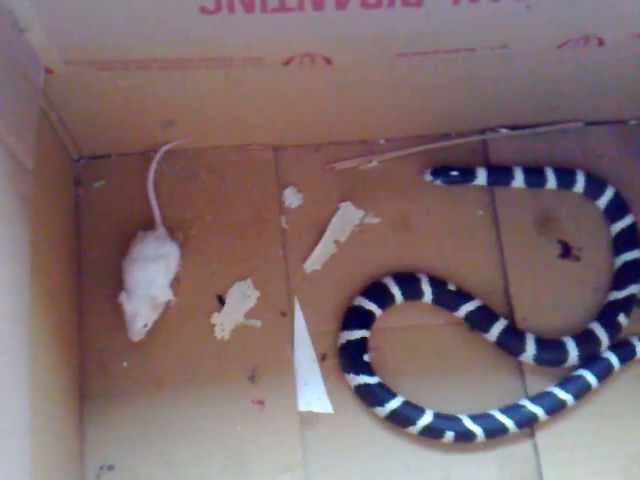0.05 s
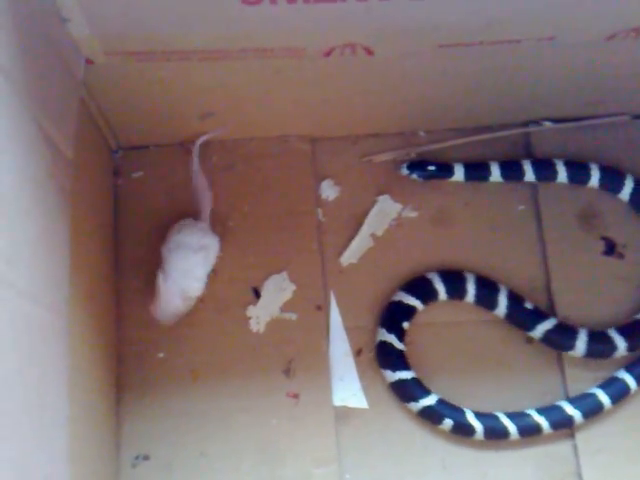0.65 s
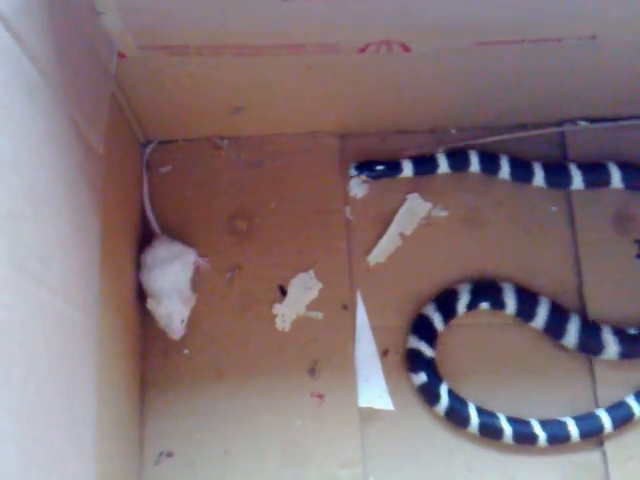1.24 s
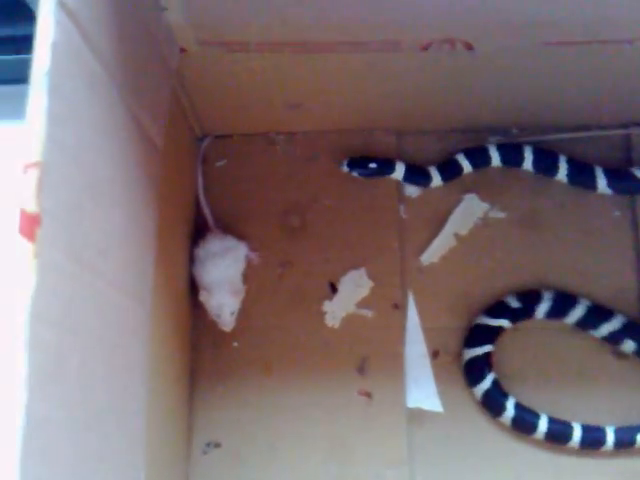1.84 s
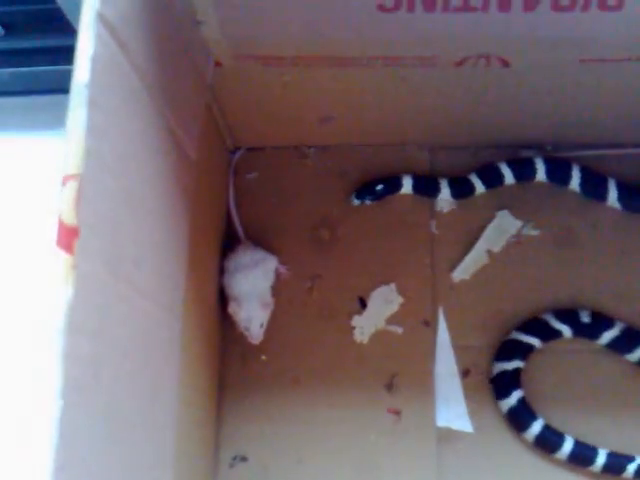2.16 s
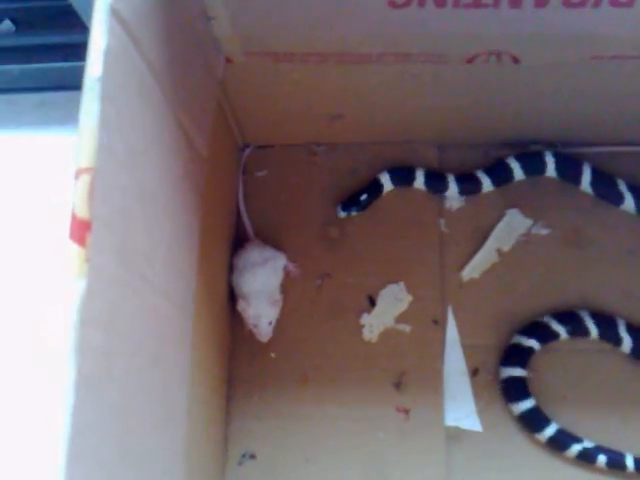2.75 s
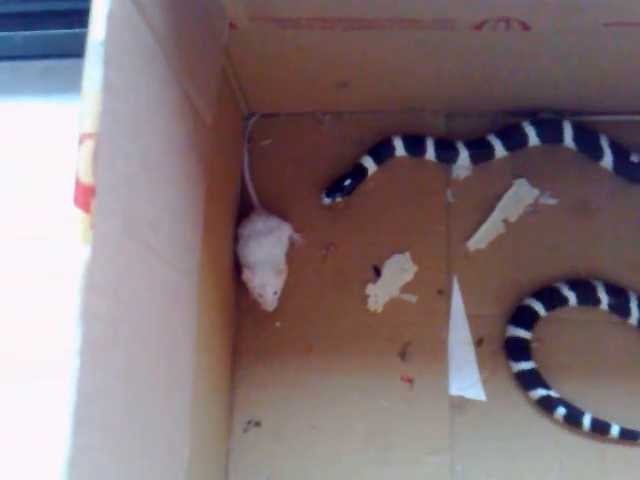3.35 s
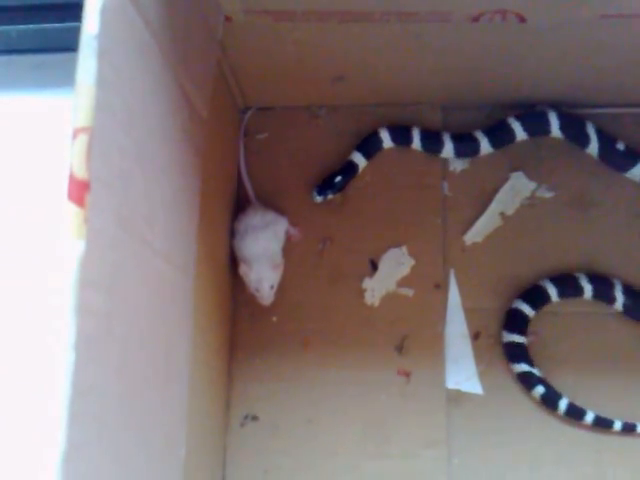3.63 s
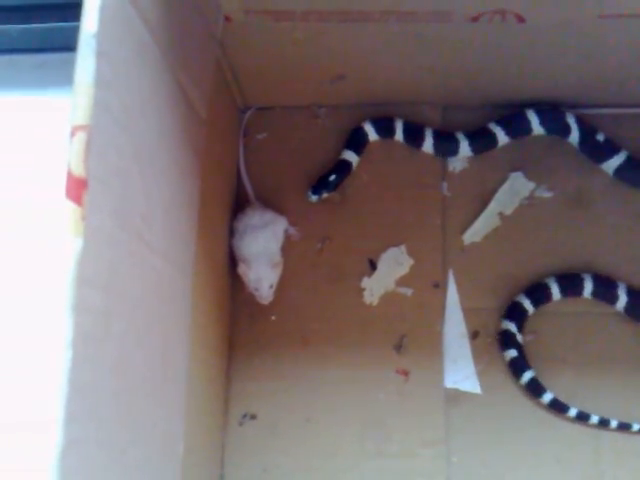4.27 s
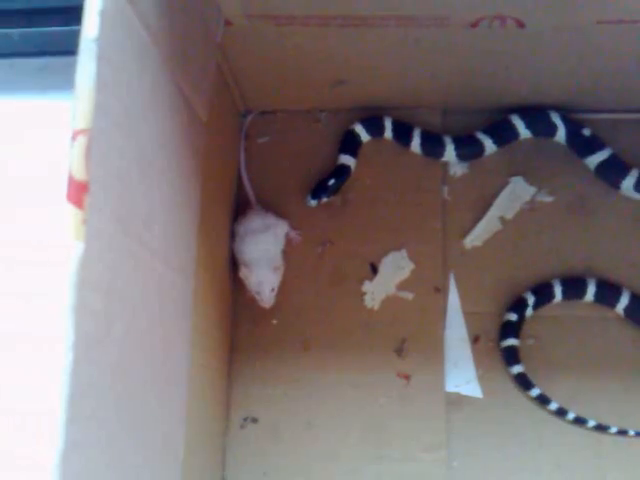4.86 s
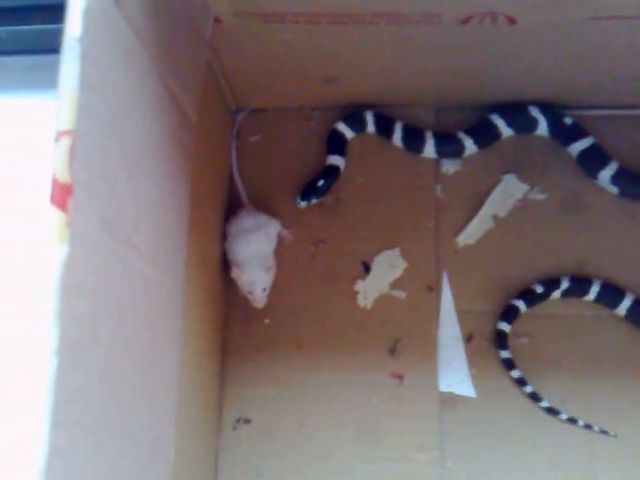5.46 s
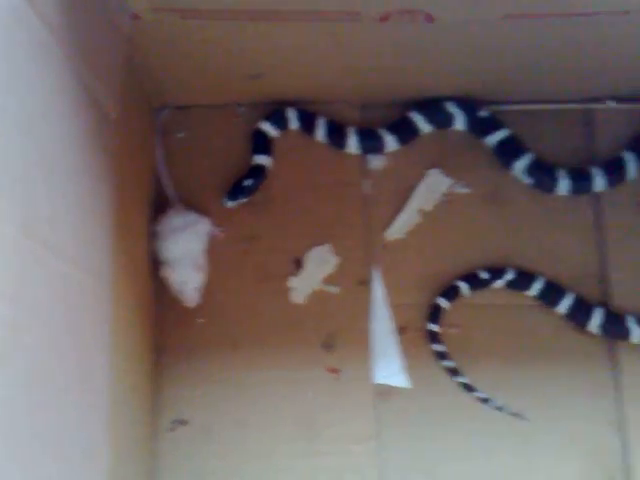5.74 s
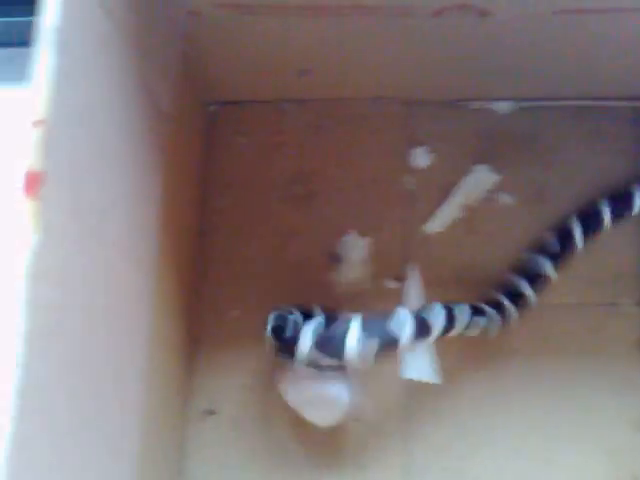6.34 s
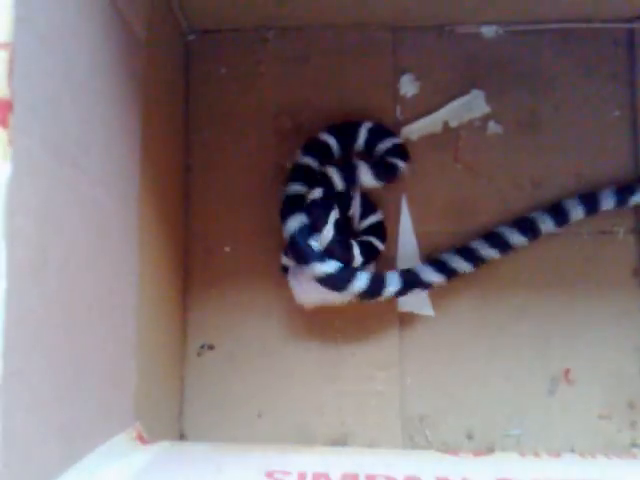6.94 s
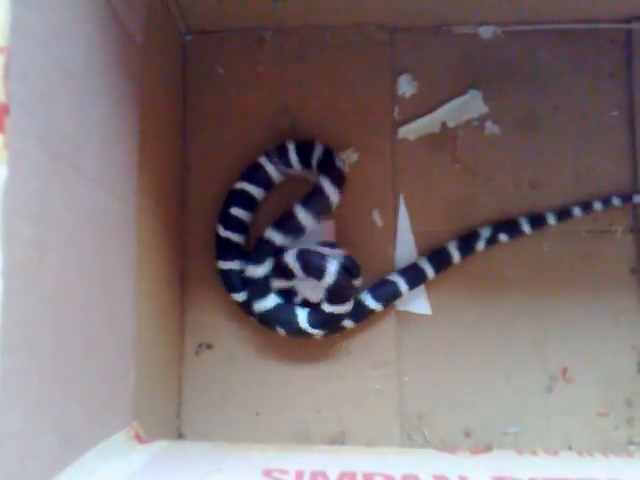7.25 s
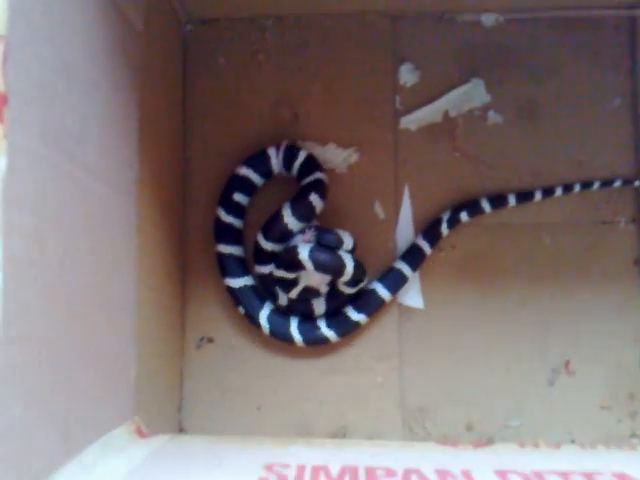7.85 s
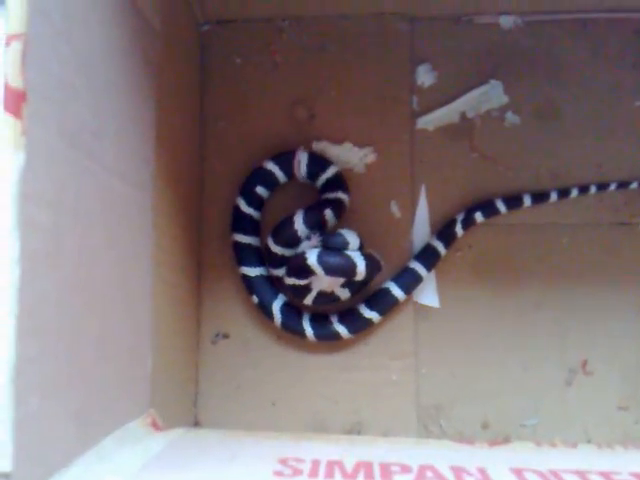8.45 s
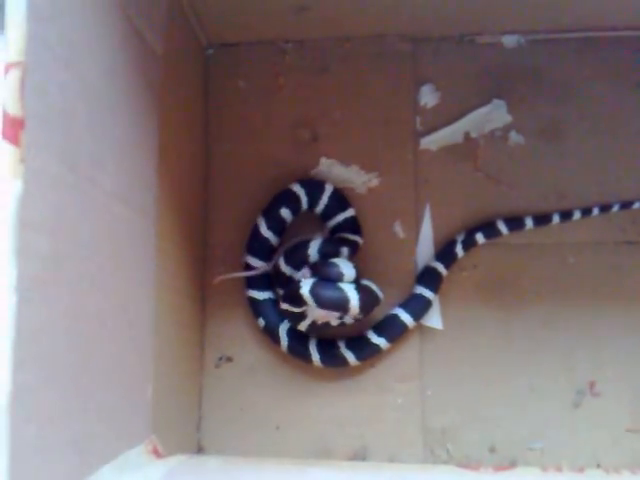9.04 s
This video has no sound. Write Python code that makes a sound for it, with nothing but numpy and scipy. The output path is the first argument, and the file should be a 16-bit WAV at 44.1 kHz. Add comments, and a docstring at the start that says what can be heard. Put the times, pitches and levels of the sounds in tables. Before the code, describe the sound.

A snake creeps over the floor of a cardboard box with faint rustling and a few light ticks. After a quiet wait it strikes a mouse: a sudden flurry of rasping scales, hoarse scraping squeaks and dull thumps on the panels. The scuffle fades into soft rubbing and scattered ticks. The microphone is close, with a tight box echo and a low room hum behind.

```python
"""A snake creeps over the floor of a cardboard box, strikes a mouse and coils round it, near a small camera.
Scales catch and slip on the board, rasping and squeaking; bodies thump the panels; claws and scraps tick.
Every contact echoes between the box walls.
Behind lie room noise, a steady hum and a low drone that rises and falls like a far engine."""
import sys
import numpy as np
from scipy import signal
from scipy.fft import rfft, irfft
from scipy.io import wavfile
from scipy.ndimage import uniform_filter1d

SR = 44100
rng = np.random.default_rng(int(sys.argv[2]) if len(sys.argv) > 2 else 0)


def to_wav(sig):
    """Store sig (one row per channel, or 1-D mono) as 16-bit WAV at the path in sys.argv[1].

    Samples outside -1..1 are clipped; the rate is SR.
    """
    pcm = np.clip(np.atleast_2d(sig), -1, 1) * 32767
    pcm = np.round(pcm).astype(np.int16)
    wavfile.write(sys.argv[1], SR, pcm.T)  # frames by channels


N = 405719
TIME = np.arange(N) / SR

# spectrum of scales on the board's surface: f/Hz, relative level/dB
SCALE_SPECTRUM = [(600, -26), (2000, -8.5), (2900, -13), (3600, 1), (4400, 4), (5400, -2), (7000, 0.5),
                  (8300, -2), (10500, 1.5), (11500, 1), (12600, 3.5), (14000, 1.5), (16000, -4.5)]


def undb(db):
    """Decibels to amplitude."""
    return 10 ** (np.asarray(db) / 20)


def unit(x):
    """Scale to rms 1."""
    return x / np.sqrt(np.mean(x ** 2))


def add(track, start_s, sound):
    """Mix a sound in from start_s."""
    i = max(int(start_s * SR), 0)
    track[i:i + len(sound)] += sound[:max(N - i, 0)]


def colour(x, points, size=4096):
    """Minimum-phase filter through (f/Hz, level/dB) points; keeps the power of white noise."""
    hz, db = np.transpose(points)
    bins_hz = np.maximum(np.fft.rfftfreq(size, 1 / SR), 1)
    gain = undb(np.interp(np.log(bins_hz), np.log(hz), db))
    cepstrum = irfft(np.log(gain))
    cepstrum[1:size // 2] *= 2
    cepstrum[size // 2 + 1:] = 0
    response = irfft(np.exp(rfft(cepstrum)))
    return signal.oaconvolve(x, response / np.linalg.norm(response))[:len(x)]


def ring(x, hz, q):
    """One resonance; keeps the power of white noise."""
    hz = min(hz, SR * 0.45)
    return signal.lfilter(*signal.iirpeak(hz, q, fs=SR), x) * np.sqrt(q * SR / (np.pi * hz))


def walk(rate_hz):
    """Smooth random wander, rms 1."""
    hold = max(int(SR / rate_hz), 1)
    steps = np.repeat(rng.standard_normal(N // hold + 1), hold)
    return unit(uniform_filter1d(steps, hold)[:N])


def slips(per_s, spread_db):
    """Tiny friction impulses of uneven size, rms 1."""
    size = undb(spread_db * np.minimum(rng.exponential(size=N), 5))
    return unit((rng.random(N) < per_s / SR) * size * rng.choice([-1, 1], N))


def burst(t60_s, count=8000):
    """Exponentially decaying noise."""
    return rng.standard_normal(count) * np.exp(-np.log(1000) * np.arange(count) / SR / t60_s)


def gesture(start_s, length_s, attack_s, release_db_per_s):
    """Power envelope, 0 to 1: attack, hold, release."""
    attack = np.clip((TIME - start_s) / attack_s, 0, 1)
    fall_db = np.clip(release_db_per_s * (TIME - start_s - length_s), 0, 200)
    return (attack * undb(-fall_db)) ** 2


def room_noise(swell_db, level_db=-41):
    """Dull noise whose rumble wavers and slightly follows the drone's swell."""
    # room noise spectrum: f/Hz, relative level/dB
    spectrum = [(12, -31.5), (20, -6), (65, -2), (116, -12.5), (176, -12), (215, -21), (284, -20.5),
                (365, -23.5), (539, -23), (733, -29.5), (891, -28.5), (1250, -37), (2060, -42),
                (2800, -46.5), (15800, -54.5)]
    air = colour(rng.standard_normal(N), spectrum, size=16384) * undb(level_db + 0.53 * walk(5.1))
    rumble = signal.sosfiltfilt(signal.butter(2, 1100, fs=SR, output="sos"), air)
    rumble_gain = undb(0.076 * swell_db + 0.65 * walk(8))
    return air + rumble * (rumble_gain - 1)


def hum():
    """Three low tones, wavering slightly in level and phase."""
    # hum tones: f/Hz, rms level/dB
    tones = [(59.3, -44.5), (172, -63.5), (526, -67)]
    return sum(np.sqrt(2) * undb(db + 1.7 * walk(4)) * np.sin(2 * np.pi * hz * TIME + 0.85 * walk(3))
               for hz, db in tones)


def drone(hz, db, swell_db, boom_hz=176.1, boom_half_width_hz=13, boom_db=13):
    """Gliding fundamental; overtones follow part of its swell and boom near a room resonance."""
    # harmonics 2 to 6 before boom and swell: level/dB
    overtones_db = [-58, -62.5, -59.5, -64, -67]
    phase = 2 * np.pi * np.cumsum(hz * (1 + 0.004 * walk(10))) / SR
    levels_db = [db]
    for k, overtone_db in enumerate(overtones_db, 2):
        lift_db = boom_db / (1 + ((k * hz - boom_hz) / boom_half_width_hz) ** 2)
        levels_db.append(overtone_db + lift_db + 0.31 * swell_db)
    return sum(np.sqrt(2) * undb(level_db + 1.2 * walk(14)) * np.sin(k * phase)
               for k, level_db in enumerate(levels_db, 1))


def background():
    """Room noise, hum and far drone."""
    # course of the drone's fundamental: t/s, f/Hz, level/dB
    course = [(0, 30.63, -36), (.4, 32.94, -34), (.75, 41.14, -34.5), (1.05, 44.58, -38.5),
              (1.6, 46.97, -44.5), (2.05, 44.34, -42), (2.65, 35.86, -36), (3.2, 29.3, -43), (4.1, 29, -50),
              (5, 28.45, -59.5), (5.3, 32.17, -41.5), (6.1, 37.37, -41.5), (7.3, 50.13, -45),
              (7.8, 31.14, -44.5), (8.6, 39.3, -40), (9.2, 31.1, -38.5)]
    times_s, *columns = np.transpose(course)
    hz, db = (np.interp(TIME, times_s, column) for column in columns)
    swell_db = db - db.mean()
    return room_noise(swell_db) + hum() + drone(hz, db, swell_db)


def reflections(x, box_db=-11, room_db=-23, delay_s=0.001194):
    """Quick reflections between the box walls, then a faint, duller room."""
    walls = colour(burst(t60_s=0.069, count=20000), [(100, -1.5), (1000, -5), (5000, -4), (16000, -11)])
    room = colour(burst(t60_s=0.2, count=20000), [(100, 2.5), (3000, -5.5), (7000, -13), (16000, -13.5)])
    response = undb(box_db) * walls / np.linalg.norm(walls) + undb(room_db) * room / np.linalg.norm(room)
    return signal.oaconvolve(x, np.pad(response, (int(delay_s * SR), 0)))[:N]


def box_echo(x):
    """Direct sound plus two echo patterns, whose blend shifts as the contact point wanders."""
    place_rad = 1.68 * walk(14)
    return x + reflections(x * np.cos(place_rad)) + reflections(x * np.sin(place_rad))


def grit(rustle, per_s=16, centre_hz=1897, spread_db=2.2, ceiling_db=-43.5, count=300):
    """Stray grains catch under the body, each on its own spot, harder under a stronger slide."""
    out = np.zeros(N)
    times_s = np.cumsum(rng.exponential(size=count)) / per_s
    for start_s, (size, pitch) in zip(times_s, rng.standard_normal((count, 2))):
        tick = ring(burst(t60_s=0.051), centre_hz * 2 ** (0.3 * pitch), q=2)
        strength = np.interp(start_s, TIME, rustle) * undb(0.5 + spread_db * size)
        add(out, start_s, min(strength, undb(ceiling_db)) * tick)
    return out


def ticks():
    """Claws and scraps, too light to move the panels: the touched spot rings briefly."""
    # light contacts: t/s, board level/dB, spot f/Hz, surface snap re board/dB
    contacts = [(.954, -34.5, 1390, -16), (1.181, -45, 2130, -10), (1.194, -48, 2030, -10),
                (1.23, -41.5, 1600, 1.5), (1.286, -46, 1460, -16), (1.312, -40, 2000, -12),
                (1.343, -39, 1460, -11), (1.881, -45, 2100, -14), (1.928, -47.5, 1910, 0),
                (1.971, -48.5, 2140, -11), (2.042, -46.5, 2020, -13), (3.53, -44.5, 1390, -13),
                (4.409, -51.5, 2160, -14), (5.42, -54, 1680, -14), (6.955, -41.5, 1500, -22),
                (7.003, -36, 1280, -20.5), (7.037, -24.5, 1590, -13), (7.106, -38, 1400, -8),
                (7.551, -29.5, 1130, -24), (7.629, -49.5, 4100, 14), (7.752, -37, 1520, 0.5),
                (7.826, -41, 1290, -17), (7.891, -39, 1660, -16), (8.035, -46, 2060, -9.5),
                (8.177, -38.5, 1520, -13), (8.82, -43, 4180, 0), (8.923, -44, 1490, -5.5),
                (9.002, -38.5, 1356, -7), (9.034, -37.5, 1590, 4)]
    spot, board, surface = np.zeros((3, N))
    for start_s, db, hz, snap_db in contacts:
        add(spot, start_s, undb(db - 2.5) * ring(burst(t60_s=0.027), hz, q=9.4))
        add(board, start_s, undb(db) * burst(t60_s=0.041))
        add(surface, start_s, undb(db + snap_db) * burst(t60_s=0.015))
    return spot, board, surface


def knocks(count=14000, slope_db_per_octave=7):
    """Bodies hit the box: a dull thud, panel modes near its pitch, a board clack and a surface snap."""
    # blows: t/s, relative thump level/dB, thump centre f/Hz, clack level/dB, snap level/dB
    blows = [(6.247, -24.5, 200, -28, -27), (6.303, -24.5, 199, -23.5, -25),
             (6.318, -27, 193.8, -10.5, -8.5), (6.334, -42, 200, -16.5, -21),
             (6.374, -24.5, 200, -15.5, -19), (6.391, -22.5, 79.5, -34, -36),
             (6.41, -21.5, 101, -24.5, -12.5), (6.49, -27, 330, -35, -30), (6.73, -14.5, 149, -16, -21),
             (6.742, -15.5, 88, -29, -23), (6.748, -19.5, 268, -12.5, -10), (6.77, -28, 175, -31, -27),
             (6.791, -45, 120, -29.5, -17), (6.887, -18, 175, -26, -31.5), (7.055, -34, 333, -25, -34.5),
             (7.132, -31.5, 403, -37, -48), (7.451, -41, 301, -35, -21), (7.475, -32, 450, -21.5, -30)]
    # panel modes: f/Hz, relative level/dB, t60/s
    panels = [(54.4, -8, .17), (88.6, 2.5, 0.21), (121, -10, 0.11), (162, -2, 0.16), (211.3, 1, 0.19),
              (267, -22.5, 0.042), (321, 5.5, 0.066), (364, -5.5, 0.3), (455, -8, 0.055), (560, -9, .04),
              (877, 5.5, 0.048)]
    thump, board, surface = np.zeros((3, N))
    hz, db, t60_s = np.transpose(panels)[:, :, None]
    t = np.arange(count) / SR
    soft_body = signal.butter(2, 700, fs=SR)  # pushes too long to excite the treble
    for start_s, thump_db, centre_hz, clack_db, snap_db in blows:
        detune = 1 + 0.02 * rng.standard_normal(hz.shape)  # the animals load the panels unevenly
        weight = undb(db - slope_db_per_octave * np.abs(np.log2(hz / centre_hz)))
        envelopes = weight / np.linalg.norm(weight) * np.exp(-np.log(1000) * t / t60_s)
        modes = envelopes * np.sin(2 * np.pi * hz * detune * t)
        ringing = modes[::2].sum(0) - modes[1::2].sum(0)
        thud = signal.lfilter(*soft_body, ring(burst(t60_s=0.075), centre_hz, q=0.97))
        add(thump, start_s, undb(thump_db - 0.5) * ringing)
        add(thump, start_s, undb(thump_db - 3) * thud)
        add(board, start_s, undb(clack_db) * burst(t60_s=0.034))
        add(surface, start_s, undb(snap_db) * burst(t60_s=0.032))
    return thump, board, surface


def squeezing():
    """The coil tightens in separate squeezes; its slips are sparser and duller than a slide's."""
    # squeezes: start t/s, length/s, relative level/dB
    squeezes = [(6.8, 0.35, -52), (7.359, 0.096, -50), (7.638, 0.2, -55), (8.183, .05, -51),
                (8.375, 0.19, -61.5), (8.8, 0.075, -53.5), (8.978, .16, -51.5)]
    # slow rubbing spectrum: f/Hz, relative level/dB
    slow_rub = [(600, -16), (2000, 4), (2800, -4.5), (3600, 10), (4400, 6), (5400, -7.5), (8000, -16),
                (12600, -27), (16000, -8)]
    power = sum(undb(db) ** 2 * gesture(start_s, length_s, attack_s=0.029, release_db_per_s=298)
                for start_s, length_s, db in squeezes)
    return colour(slips(per_s=1300, spread_db=6), slow_rub) * np.sqrt(power) * undb(-2)


def strokes():
    """Quick strokes of scales and claws swell and fade, each a rasp with a hoarse squeak."""
    # strokes: middle t/s, length/s, rasp level/dB, squeak f/Hz, squeak re rasp/dB
    swipes = [(1.314, 0.013, -48, 14000, 4), (1.351, 0.0078, -36, 14000, 6.5), (1.361, .013, -50, 14000, 8),
              (1.414, 0.013, -40, 13500, -5), (3.531, .006, -44, 10000, 3),
              (6.264, 0.074, -21.5, 6280, -9.5), (6.303, .0476, -22, 12960, 0.5),
              (6.387, 0.025, -29.5, 13000, -1), (6.414, 0.018, -11, 4460, -16),
              (6.453, .027, -15, 9900, -1), (6.485, 0.063, -11.5, 6950, -7.5),
              (6.542, 0.073, -16, 4500, -0.5), (6.641, 0.03, -21, 12500, -16),
              (6.677, 0.06, -25, 12500, -14), (7.056, 0.03, -32, 4370, -5),
              (7.107, 0.014, -29.5, 12500, -18.5), (7.467, 0.022, -34, 12500, -11),
              (7.504, 0.038, -25, 13100, -2), (8.234, 0.028, -56, 4080, 8), (9.004, .036, -45, 4020, 1)]
    out = np.zeros(N)
    rasp = colour(slips(per_s=8200, spread_db=3), SCALE_SPECTRUM)
    for middle_s, length_s, db, squeak_hz, squeak_db in swipes:
        count, start_s = int(length_s * SR), middle_s - length_s / 2
        squeak = unit(ring(rng.standard_normal(count), squeak_hz, q=16))
        scrape = unit(rasp[int(start_s * SR):][:count])
        add(out, start_s, undb(db) * np.hanning(count) * (scrape + undb(squeak_db) * squeak))
    return out


def slide_levels(rest_rustle_db=-64, rest_hiss_db=-71.5):
    """Rustle and hiss amplitudes: the body's slides add in power to its constant faint shifting."""
    # creep, strike and coil: start t/s, length/s, relative board rustle/dB, relative scale hiss/dB
    slides = [(0, 3.08, -62, -71), (1.171, 0.35, -51.5, -63), (1.833, 0.21, -59, -68),
              (0.207, 0.042, -58, -64), (6.179, 0.29, -33.5, -31), (6.221, 0.12, -24.5, -41),
              (6.394, 0.25, -31.5, -31), (6.421, 0.14, -52, -20), (6.625, 0.038, -29.5, -25.5),
              (6.695, 0.11, -35, -39), (6.814, 0.085, -41.5, -50.5), (7.011, .1, -40, -43.5),
              (7.13, 0.4, -48.5, -60), (7.239, 0.099, -49, -50.5), (7.433, 0.062, -35, -33.5),
              (7.522, 0.056, -44.5, -54), (7.596, 0.31, -56.5, -61), (8.15, .4, -58.5, -67.5),
              (8.8, 0.31, -59.5, -64)]
    rustle_power, hiss_power = undb(rest_rustle_db) ** 2, undb(rest_hiss_db) ** 2
    for start_s, length_s, rustle_db, hiss_db in slides:
        power = gesture(start_s, length_s, attack_s=0.027, release_db_per_s=326)
        rustle_power += power * undb(rustle_db) ** 2
        hiss_power += power * undb(hiss_db) ** 2
    return np.sqrt(rustle_power), np.sqrt(hiss_power)


def sliding(rustle, hiss):
    """Scale edges catch and let go under wavering pressure; gives the forces on board and surface."""
    pressure_db = 1.47 * walk(170)
    board = slips(per_s=2400, spread_db=3) * rustle * undb(pressure_db - 1.5)
    surface = slips(per_s=5000, spread_db=2.5) * hiss * undb(pressure_db - 0.36)
    return board, surface


def scene():
    """Slides, knocks and ticks drive the same board and surface; all contacts echo in the box."""
    # struck board spectrum: f/Hz, relative level/dB
    board_spectrum = [(100, -7.5), (250, -11.5), (450, -9.5), (680, -12), (1020, -5.5), (1280, -2),
                      (1600, -4), (2100, -5.5), (2600, -13), (3300, -13.5), (4100, -11.5), (5200, -18.5),
                      (9000, -28), (16000, -35.5)]
    rustle, hiss = slide_levels()
    slide_board, slide_surface = sliding(rustle, hiss)
    thump, knock_board, knock_surface = knocks()
    spot, tick_board, tick_surface = ticks()
    board = colour(slide_board + knock_board + tick_board, board_spectrum)
    surface = colour(slide_surface + knock_surface + tick_surface, SCALE_SPECTRUM)
    contacts = board + surface + strokes() + squeezing() + thump + spot + grit(rustle)
    return (box_echo(contacts) + background())[None]


def record(dry, low_hz=24, top_hz=15900):
    """The camera drops the deepest bass, rounds the highest peaks and cuts the top."""
    highpass = signal.butter(4, low_hz, "high", fs=SR, output="sos")
    lowpass = signal.ellip(10, 0.2, 70, top_hz, fs=SR, output="sos")
    rounded = np.tanh(signal.sosfilt(highpass, dry))
    return signal.sosfilt(lowpass, rounded)


dry = scene()
out = record(dry)
to_wav(out)
```